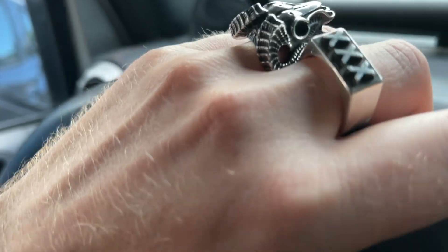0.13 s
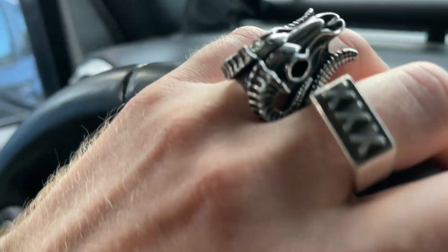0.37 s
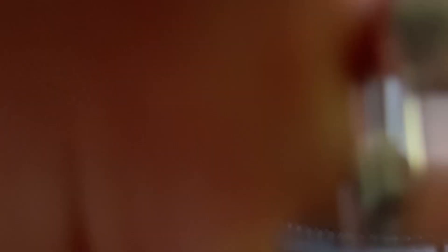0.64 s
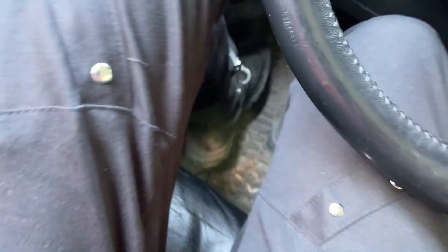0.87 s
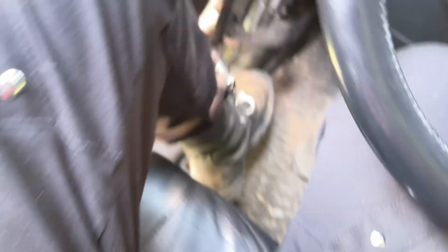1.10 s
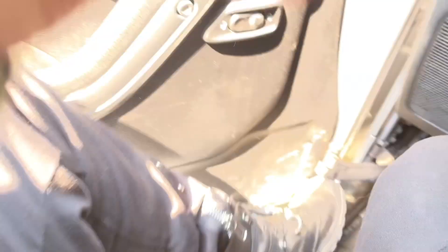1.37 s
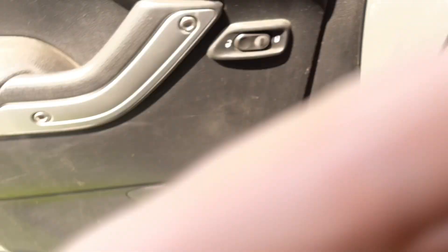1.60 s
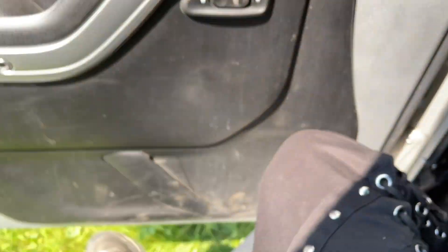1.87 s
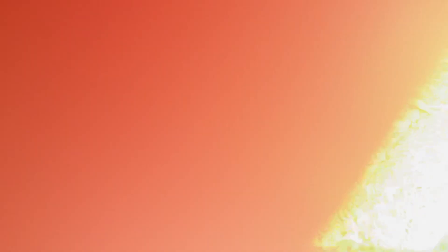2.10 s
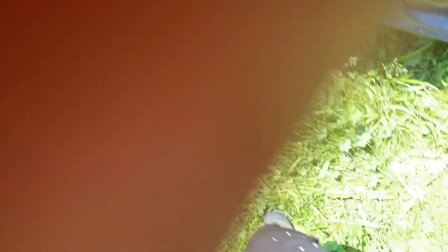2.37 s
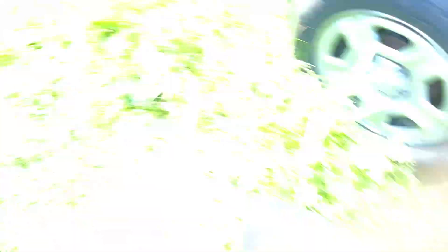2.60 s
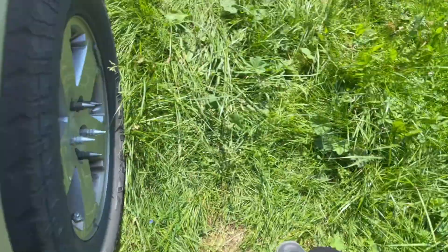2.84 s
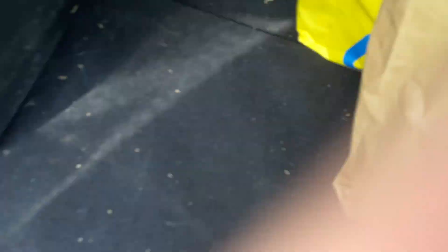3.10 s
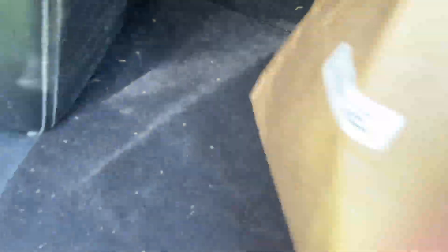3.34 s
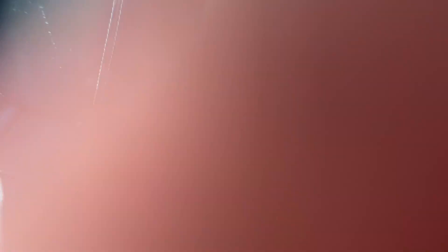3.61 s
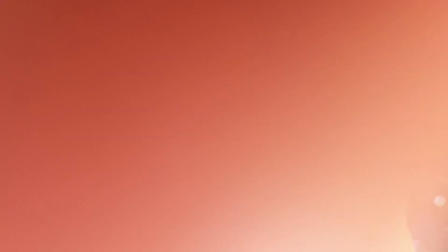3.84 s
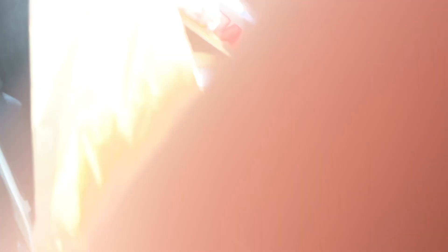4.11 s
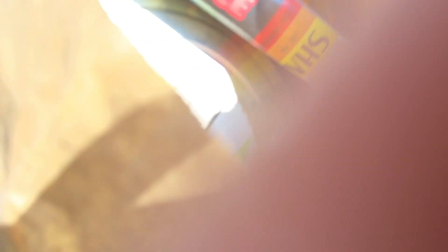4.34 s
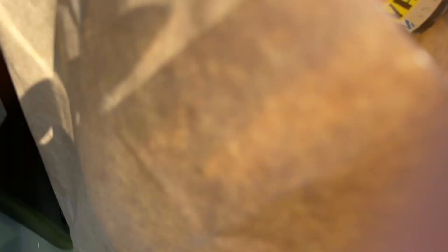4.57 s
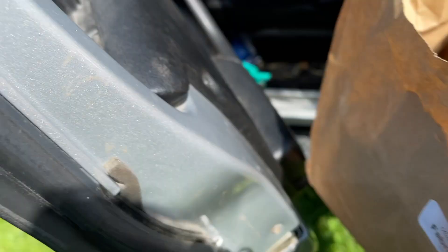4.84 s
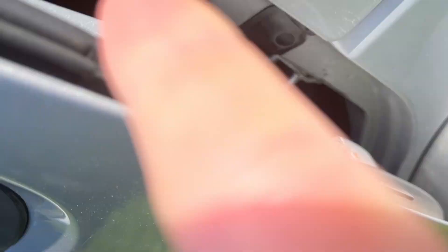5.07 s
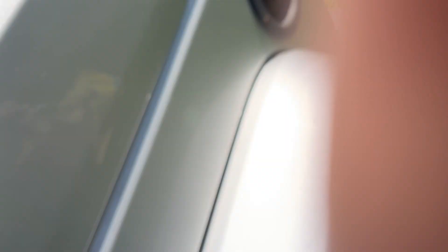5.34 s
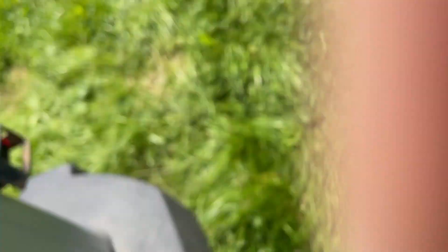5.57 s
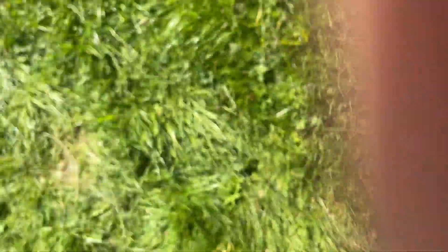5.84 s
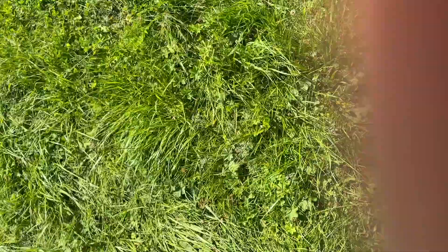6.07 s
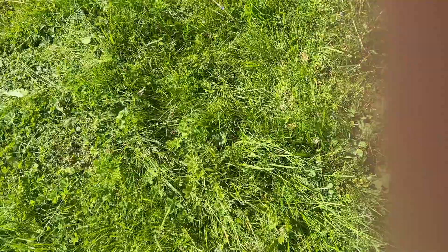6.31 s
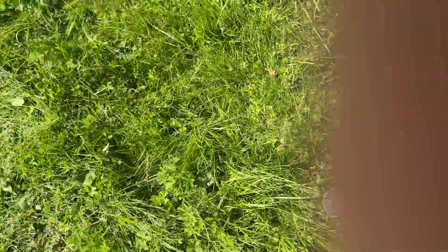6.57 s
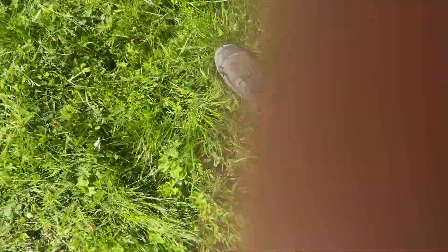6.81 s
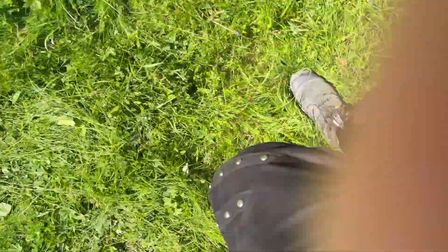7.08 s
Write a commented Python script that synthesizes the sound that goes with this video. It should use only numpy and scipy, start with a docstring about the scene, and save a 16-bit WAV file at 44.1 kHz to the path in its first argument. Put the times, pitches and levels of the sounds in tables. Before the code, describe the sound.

Bright key clinks and a clunky car door opening, then a heavy slam, loud paper bag crumpling, another door slam and faint knocks over grass.

```python
"""Inside a parked car a hand takes the keys and opens the door; outside on grass the door is slammed,
a paper bag is lifted out, a second door is shut and footsteps follow. Keys, knocks and doors are struck
modes with bursts of noise; cloth, paper and sliding surfaces are coloured noise that sticks and slips.
The phone is held in a moving hand, which rumbles and knocks on its case; close reflections are added,
and its two microphone ports hear the treble out of step."""
import sys
import numpy as np
from scipy import signal
from scipy.fft import rfft, irfft, next_fast_len
from scipy.io import wavfile
from scipy.ndimage import uniform_filter1d

SR = 44100
rng = np.random.default_rng(int(sys.argv[2]) if len(sys.argv) > 2 else 0)


def voltage_ratio(level):
    """Linear amplitude factor for a level in decibels (scalar or array-like)."""
    return 10 ** (np.asarray(level, float) / 20)


def bounce(signal):
    """Save signal as a 16-bit WAV file at the path given by the first command-line argument."""
    frames = np.transpose(np.atleast_2d(signal))
    limited = np.clip(frames, -1, 1)
    pcm = np.round(limited * 32767).astype(np.int16)
    wavfile.write(sys.argv[1], SR, pcm)


N = 317079


def at_hz(points, hz):
    """A (frequency [Hz], value) table read on a log-frequency axis."""
    f, value = np.transpose(points)
    return np.interp(np.log(hz + 1), np.log(f + 1), value)


def shaped(x, gain):
    """Filter by a gain given as a function of frequency."""
    size = next_fast_len(N + 8192)
    hz = np.arange(size // 2 + 1) * SR / size
    return irfft(rfft(x, size) * gain(hz), size)[..., :N]


# how far a broad source differs between the ports: (frequency [Hz], level of the differing part [dB])
PORT_DIFFERENCE = [(60, -10.5), (250, -10.5), (600, -4.5), (4000, -10.5), (7000, -5), (13000, -61)]


def noise(spectrum):
    """Steady noise of a given colour from a broad source, partly different at each port; rms 1."""
    mid, side = rng.standard_normal((2, N))
    side = shaped(side, lambda hz: voltage_ratio(at_hz(PORT_DIFFERENCE, hz)))
    pair = mid + side * [[1], [-1]]
    x = shaped(pair, lambda hz: voltage_ratio(at_hz(spectrum, hz)))
    return x / x.std()


def gains(tables):
    """Columns of dB over time as smoothed gains, near silence outside each table; tables add up."""
    out, seconds = 0, np.arange(N) / SR
    for rows in tables:
        s, *columns = np.transpose(rows)
        out = out + np.array([voltage_ratio(np.interp(seconds, s, c, left=-120, right=-120)) for c in columns])
    return uniform_filter1d(out, size=200, axis=1)


def dying(t60):
    """Amplitude falling 60 dB in t60 seconds, cut after 1 s at most."""
    return voltage_ratio(-60 * np.arange(int(min(t60, 1) * SR)) / (t60 * SR))


def swelling(length, rise_s):
    """Exponential onset with a time constant of rise_s."""
    return 1 - np.exp(-np.arange(length) / (rise_s * SR))


def add(out, s, x):
    """Place a sound at s seconds."""
    i = round(s * SR)
    out[:, i:i + x.shape[-1]] += x[..., :N - i]


def tone(hz, t60):
    """One struck mode: a decaying sine."""
    fall = dying(t60)
    return fall * np.sin(2 * np.pi * hz / SR * np.arange(len(fall)))


def burst(source, s, t60, rise_s=0.003):
    """A puff cut from running noise, with a soft onset and an exponential decay."""
    fall, i = dying(t60), round(s * SR)
    fall = fall * swelling(len(fall), rise_s)
    return source[:, i:i + len(fall)] * fall[:N - i]


def slips(per_s, spread_db, t60, steady):
    """Envelope of rubbing: a steady part plus random slips that start sharply and die; rms 1."""
    happens = rng.random(N) < per_s / SR
    sizes = voltage_ratio(spread_db * np.minimum(rng.exponential(1, N), 5)) * happens
    envelope = signal.lfilter([1], [1, -voltage_ratio(-60 / (t60 * SR))], sizes)
    envelope = steady + envelope / envelope.mean()
    return envelope / np.sqrt(np.mean(envelope ** 2))


def rubbing(rows, colours, grain):
    """Surfaces stick and slip: all parts of the spectrum share one grain of slips."""
    return grain * sum(gain * noise(colour) for gain, colour in zip(gains(rows), colours))


# colour of still air: (frequency [Hz], relative level [dB per Hz])
AIR_COLOUR = [(24, -27), (40, 3), (91, 4), (1300, -19), (6930, -29), (8830, -14), (10200, -46), (11000, -7),
              (13000, -115)]


def still_air():
    """Steady coloured noise, the quiet bed under everything."""
    return voltage_ratio(-56) * noise(AIR_COLOUR)


# the hand shifts on the phone: (time [s], rumble level [dB])
GRIP_MOVES = [(0, -37.5), (.12, -57), (.24, -28.5), (.45, -35), (.59, -42.5), (.74, -41), (1.3, -35.5),
              (1.65, -33.5), (1.97, -40), (2.17, -50), (2.45, -43), (2.64, -63), (3.1, -34), (3.6, -36.5),
              (4.4, -44.5), (4.6, -23.5), (4.7, -43.5), (5.05, -35), (5.2, -34), (5.77, -36), (6.07, -37),
              (6.14, -58), (6.6, -57.5), (6.85, -50), (6.93, -42.5), (7.05, -40), (7.19, -57)]
# low rumble and creak of handling: (frequency [Hz], relative level [dB per Hz])
RUMBLE_COLOUR = [(15, -46), (25, -23.5), (60, 0.5), (130, -8.5), (170, -12.5), (290, -120)]
CREAK_COLOUR = [(65, -7.5), (110, -4), (237, -6), (291, -16.5), (450, -22), (580, -23), (990, -120)]
FIRM_GRIP_DB, FIRM_CREAK_DB = -39, -47.5   # rumble level of a firm grip, and the creak gain it gives
CREAK_FOLLOWS = 1.03   # dB of creak per dB of rumble


def hand():
    """Lumpy rumble carried through the case, with a creak that grows as the grip firms."""
    moves = [(s, db, FIRM_CREAK_DB + CREAK_FOLLOWS * (db - FIRM_GRIP_DB)) for s, db in GRIP_MOVES]
    rumble, creak = gains([moves])
    lumps = uniform_filter1d(slips(30, 0.84, 0.081, 0.35), size=300)
    shifts = uniform_filter1d(slips(14.0, 0.83, 0.3, 0.2), size=900)
    return rumble * noise(RUMBLE_COLOUR) * shifts + creak * noise(CREAK_COLOUR) * lumps


# sleeve and trousers rub: (time [s], dull level [dB], bright part against the dull [dB])
CLOTH_RUBS = [(0, -62.5, 28), (.3, -64.5, 2.5), (.46, -54.5, 8), (.59, -72, 4), (.78, -40, 5.5),
              (.9, -41, -9), (1.12, -49, -1.5), (1.64, -43, -9.5), (1.83, -48.5, -4.5), (1.92, -62.5, -2),
              (2.05, -50.5, -0.5), (2.2, -60.5, -3.5), (2.6, -61, 10.5), (2.7, -44.5, 5), (2.78, -56.5, -7),
              (3.05, -55, 10), (3.2, -82, -18), (5.2, -55, -8), (5.56, -50.5, 3), (5.8, -61.5, -6),
              (6.1, -59, 2.5), (6.29, -51, -4.5), (6.6, -60.5, -4.5), (6.75, -52.5, 6.5), (6.87, -56, 1),
              (7.19, -47, -4)]
# dull and bright parts of cloth: (frequency [Hz], relative level [dB per Hz])
DULL_CLOTH = [(210, -6), (350, 0.5), (555, 1), (702, -2), (1980, -7), (2800, -16), (3640, -13),
              (6160, -120)]
BRIGHT_CLOTH = [(1290, -10), (2200, -7.5), (4960, -5.5), (8930, -3), (10100, 4.5), (11300, 0), (12500, -28),
                (14000, -43)]


def cloth():
    """Fibres catch and let go: a dull and a bright noise slip together."""
    rows = [(s, db, db + tilt) for s, db, tilt in CLOTH_RUBS]
    return rubbing([rows], [DULL_CLOTH, BRIGHT_CLOTH], slips(150, 2.3, 0.089, 0.73))


# keys clink: (time [s], level [dB], strongest mode [Hz], crack against the clink [dB])
KEY_CLINKS = [(0.011, -14, 9350, -3), (0.0299, -12.5, 7100, -21), (0.0453, -6, 9430, -34),
              (0.1056, -28, 9400, -15), (0.1243, -24.5, 8300, -9), (0.149, -28, 7300, -12),
              (0.1752, -31, 7250, -5), (0.224, -27, 7900, -4), (0.2422, -27, 7600, 2.5),
              (0.2697, -30.5, 7860, 3.5), (0.3431, -18, 6900, 0), (0.3745, -37, 4220, 8),
              (0.3927, -28, 8100, 0), (0.415, -24.5, 8800, -10), (0.425, -24, 8400, -18),
              (0.4425, -26, 11300, -18), (0.4722, -22, 11000, -12), (0.4882, -20.5, 8500, -10),
              (0.4948, -18, 8200, -3), (0.519, -28, 6900, -6), (0.604, -26, 7750, -18),
              (0.636, -38, 7680, -24), (0.673, -19.5, 8740, 0), (0.7267, -23, 11000, -15),
              (0.7478, -19, 8100, 7), (0.76, -24, 11100, -22), (0.893, -31, 8600, -18),
              (1.028, -29, 7120, -8), (1.05, -11, 9300, -29), (1.1036, -23, 8940, 2),
              (1.1623, -24.5, 5040, -4), (1.186, -30.5, 5050, 0)]
# the bunch of keys: (frequency [Hz], relative level [dB], ring time to -60 dB when hung free [s])
BUNCH_MODES = [(3980, -12, 0.071), (5040, -21, 0.082), (7300, -19, .1), (7550, -6, 0.13), (7500, -2.5, 0.2),
               (8130, -13, 0.19), (8940, -12, 0.042), (8470, 0, 0.15), (9430, 13, 0.12), (9200, -5, 0.051),
               (11000, 0, 0.16), (12400, -25, .05)]
# keys lean on each other: uneven [dB], detuned [share of pitch], damped [share of the free ring time]
KEY_SPREAD_DB, KEY_DETUNE, KEY_DAMPING = 4.5, 0.015, 0.36


def keys():
    """Each clink is a crack with a rattling tail, one short strong mode and the bunch ringing unevenly."""
    out = np.zeros((2, N))
    hiss = noise([(1500, -13.0), (4000, -5.5), (8000, -2.5), (12000, -2), (15000, -3.0)])
    rattle = hiss * slips(300, 4.6, 0.013, 0.39)
    chance = rng.standard_normal((len(KEY_CLINKS), len(BUNCH_MODES), 2))
    for (s, db, hz, crack_db), draw in zip(KEY_CLINKS, chance):
        add(out, s, voltage_ratio(db + crack_db) * burst(hiss, s, 0.0097, rise_s=0.00032))
        add(out, s, voltage_ratio(db + crack_db / 2 - 12) * burst(rattle, s, 0.1))
        add(out, s, voltage_ratio(db - 4.5) * tone(hz, 0.017))
        for (mode_hz, mode_db, ring_s), (strength, lean) in zip(BUNCH_MODES, draw):
            ring = tone(mode_hz * (1 + KEY_DETUNE * lean), KEY_DAMPING * ring_s)
            add(out, s, voltage_ratio(db + mode_db + KEY_SPREAD_DB * strength - 25.5) * ring)
    return out


# soft bumps of the hand on the case: (time [s], level [dB], note [Hz], note's fall by 60 dB [s])
HAND_BUMPS = [(0.011, -30, 204, 0.094), (0.228, -9.5, 159, 0.059), (0.38, -17, 80, 0.11),
              (.708, -21.5, 105, 0.2), (1.343, -21.5, 103, 0.12), (1.65, -16, 167, 0.088),
              (2.1, -27, 113, 0.13), (2.29, -32, 147.5, 0.078), (3.446, -17, 205, 0.1),
              (3.625, -24, 200, 0.15), (4.464, -9.5, 212, 0.047), (4.564, -5, 190, 0.049),
              (4.577, -1, 109, 0.036), (4.822, -26.5, 84.5, .12), (5.082, -23.5, 108, 0.11),
              (5.551, -29, 154, .1), (5.81, -21, 154, 0.069), (5.872, -22, 150, 0.084),
              (5.932, -23.5, 89, 0.077), (6.004, -20.5, 156, 0.061), (6.048, -20.5, 170, 0.048),
              (6.74, -21.5, 105, 0.061), (6.921, -25, 107, 0.12), (6.96, -29, 62.4, 0.19),
              (7.01, -29, 74.6, 0.14)]


def bumps():
    """A soft blow: one low note that swells in, with a puff of creak."""
    out, creak = np.zeros((2, N)), noise(CREAK_COLOUR)
    for s, db, hz, t60 in HAND_BUMPS:
        note = tone(hz, np.clip(t60, 0.03, 0.4))
        add(out, s, voltage_ratio(db + 3.0) * note * swelling(len(note), 0.012))
        add(out, s, voltage_ratio(db - 12.5) * burst(creak, s, 2.1 * t60, rise_s=0.0027))
    return out


# knocks on trim, case and ground: (time [s], level [dB], body note [Hz], treble level [dB])
HARD_KNOCKS = [(0.184, -27.5, 416, -54), (0.375, -23.5, 533, -54), (0.636, -31, 443, -32.5),
               (0.704, -28.5, 412, -63), (.75, -28, 2200, -23), (0.839, -14, 1200, -38),
               (0.892, -13.5, 1530, -18.5), (1.428, -29, 775, -43), (1.485, -32, 515, -32),
               (1.64, -12.5, 576, -51), (1.699, -33, 473, -37), (1.732, -16, 514, -58),
               (1.793, -12.5, 535, -30.5), (1.935, -19.5, 500, -55), (1.989, -24.5, 450, -28.5),
               (2.223, -32, 494, -55), (2.316, -34, 480, -42), (3.065, -11, 764, -27),
               (3.921, -18.5, 623, -52), (4.399, -32, 556, -66), (4.447, -20, 958, -44),
               (4.702, -26, 640, -60), (4.76, -18.5, 1080, -60), (5.682, -21.5, 550, -24.5),
               (5.79, -42, 490, -54), (5.861, -37, 301, -35), (5.933, -49, 344, -55),
               (5.955, -53, 342, -40), (6.319, -33.5, 292, -49), (6.366, -31.5, 404, -42),
               (6.455, -35, 937, -35.5), (6.714, -26.5, 358, -33), (6.868, -22.5, 593, -34),
               (6.899, -35, 550, -52), (6.909, -40, 1200, -41), (6.959, -30, 564, -29.5),
               (7.003, -31, 565, -48), (7.037, -21.5, 700, -28), (7.058, -32, 1200, -33),
               (7.119, -21.5, 1000, -30)]
KNOCK_CYCLES = 11   # a body note falls 60 dB within this many cycles
TOUCH_T60_S, KNOCK_T60_S = 0.007, 0.051   # the first touch, and the dull puff after it


def knocks():
    """A hard blow: a damped body note, a dull puff and a short tick."""
    out = np.zeros((2, N))
    dull = noise([(120, -25), (300, 18.5), (700, 16.5), (2000, 5), (3500, -12), (6000, -24)])
    tick = noise([(1500, 10.0), (3000, 2.5), (8000, -6.5), (13000, -8), (15000, -11)])
    for s, db, hz, treble_db in HARD_KNOCKS:
        add(out, s, voltage_ratio(db - 3) * tone(hz, KNOCK_CYCLES / hz))
        add(out, s, voltage_ratio(db - 3.5) * burst(dull, s, TOUCH_T60_S, rise_s=0.0006))
        add(out, s, voltage_ratio(treble_db + 3.5) * burst(tick, s, TOUCH_T60_S, rise_s=0.00024))
        add(out, s, voltage_ratio(db - 9.5) * burst(dull, s, KNOCK_T60_S))
        add(out, s, voltage_ratio(treble_db + 2.5) * burst(tick, s, 0.29 * KNOCK_T60_S))
    return out


# metallic clatter: (frequency [Hz], relative level [dB per Hz])
CLATTER_COLOUR = [(180, -22), (300, -2), (1940, -19.5), (2720, -22.5), (4190, -27.5), (8920, -30.5),
                  (10100, -24), (11200, -25), (14000, -90)]
LATCH_HZ = 600   # modes from here up belong to the latch
BODY_DB, BODY_T60_S = -24.5, 0.79   # the car body rocks on after a blow; level against the panel


def door(blows, modes):
    """Each contact pumps cabin air (lowest mode), rings panel and latch and throws a dying clatter."""
    out, metal = np.zeros((2, N)), noise(CLATTER_COLOUR) * slips(400, 4.7, 0.014, 1.0)
    shudder = noise([(50, -17), (110, 6.5), (300, 0.5), (700, -22.5), (1500, -37.5), (3000, -61.5)])
    rocking = noise(RUMBLE_COLOUR) + 0.5 * noise(CREAK_COLOUR)
    for s, boom_db, panel_db, clatter_db, t60 in blows:
        add(out, s, voltage_ratio(clatter_db) * burst(metal, s, np.clip(t60, 0.01, 0.4), rise_s=0.0036))
        add(out, s, voltage_ratio(panel_db - 12) * burst(shudder, s, 0.21, rise_s=0.001))
        add(out, s, voltage_ratio(panel_db + BODY_DB) * burst(rocking, s, BODY_T60_S, rise_s=0.019))
        for k, (hz, db, ring_s) in enumerate(modes):
            if k == 0:
                drive_db = boom_db
            elif hz < LATCH_HZ:
                drive_db = panel_db - 14
            else:
                drive_db = clatter_db - 10.0
            polarity = (-1) ** k
            add(out, s, polarity * voltage_ratio(db + drive_db) * tone(hz, np.clip(ring_s, 0.02, 1.2)))
    return out


# latch and frame meet as a door opens, is slammed, and a second is shut, one list for each:
# (time [s], boom level [dB], panel level [dB], clatter level [dB], clatter's fall by 60 dB [s])
DOOR_CONTACTS = [
    [(.752, -47, -21, -38, 0.058), (.779, -11.5, 3, -9, 0.17), (.800, 4, -0.5, -43, 0.13),
     (.893, -22, -27, -21, 0.038), (.938, -12, -30, -50, 0.037), (.988, -33, 0, -3.5, 0.028),
     (1.0, -28, -19, -21, 0.12), (1.045, -14, -51, -40, 0.088)],
    [(2.707, -38, -37, -13, 0.029), (2.716, -12, 1, -9.5, 0.11), (2.730, -8, -12, -14, 0.038),
     (2.746, -5, -7.5, -13.5, 0.063), (2.762, -8.5, -2.5, -33, 0.23)],
    [(5.185, -55, -24, -30.5, 0.049), (5.200, -23, -5, -8.5, 0.14), (5.213, -6, -6, -11.5, 0.064),
     (5.225, 2, 0.5, -11, 0.043), (5.245, 6.5, -8.5, -10, 0.048)],
]
# door skin and cabin air: (frequency [Hz], relative level [dB], ring time to -60 dB [s])
OPENED_DOOR = [(60.3, 2, 0.23), (93.6, -1.5, 0.56), (159.6, -5.5, 0.39), (251, -20, 0.19),
               (324, 0.5, 0.046), (494, -3.5, 0.13), (770, -30, 0.086), (1350, -9, 0.037)]
FRONT_DOOR = [(48.2, -0.5, 0.74), (95.8, 4, 0.9), (125, -14, 0.26), (205, 0, 0.46), (267.2, -2, 0.33),
              (345, -7, 0.11), (451, -2, 0.094), (672, -9, 0.18), (864, -8, 0.077), (1173, 4, 0.038),
              (1290, -33, 0.041)]
REAR_DOOR = [(74.3, -11.5, 0.25), (141.4, -2.5, 0.8), (190, 7, 0.22), (215, 8.5, 0.41), (257, -10, 0.36),
             (323, -16, 0.13), (441, -14, 0.21), (613, 0.5, 0.093), (776, -2, 0.075), (1030, -17, 0.12),
             (1600, 4, 0.034)]


def doors():
    """Opening, slam and second door, each a run of contacts exciting its own set of modes."""
    return sum(map(door, DOOR_CONTACTS, [OPENED_DOOR, FRONT_DOOR, REAR_DOOR]))


# a surface slides past: (time [s], length [s], dull level [dB], bright level [dB], top fizz level [dB])
SLIDES = [(1.936, 0.047, -37.5, -46.5, -38), (2.084, 0.083, -50.5, -49.5, -49.5),
          (3.592, 0.047, -26, -18.5, -23.5), (4.311, 0.055, -45.5, -47.5, -45),
          (4.447, 0.014, -32, -42.5, -43), (4.827, 0.076, -28, -34, -24.5), (4.93, 0.094, -30, -37, -35.5),
          (5.44, 0.051, -47.5, -57, -51), (5.53, 0.052, -49, -74, -57), (5.682, 0.047, -43, -51.5, -46.5),
          (6.989, 0.035, -38.5, -65, -50), (7.091, 0.043, -41, -66, -60)]
# dull, bright and fizzing parts of paper and sliding: (frequency [Hz], relative level [dB per Hz])
DULL_PAPER = [(210, -2.5), (350, -1.5), (600, -4.5), (843, -4), (2800, -13), (3640, -20), (6160, -120)]
BRIGHT_PAPER = [(1290, -15), (2200, -5), (2910, -9.5), (4300, -3), (8000, -9), (10400, -6), (17600, -120)]
PAPER_FIZZ = [(5500, -56), (7500, -1.5), (9500, 4), (11500, 2), (13500, -26)]


def swishes():
    """Sliding starts at once, holds for just over half its length, falls 9 dB and stops."""
    strokes = []
    for s, length, *db in SLIDES:
        end_db = np.subtract(db, 9)
        strokes.append([(s, *db), (s + 0.54 * length, *db), (s + length, *end_db)])
    return rubbing(strokes, [DULL_PAPER, BRIGHT_PAPER, PAPER_FIZZ], slips(360, 0.47, 0.017, 1.0))


def crinkles(per_s, cycles):
    """Small creases pop at random, each ringing one of 16 short notes; rms 1."""
    happens = rng.random(N) < per_s / SR
    sizes = voltage_ratio(4.0 * np.minimum(rng.exponential(1, N), 3.5)) * happens
    out, dealt = 0, rng.integers(0, 16, N)
    for k, hz in enumerate(np.geomspace(700, 9000, 16)):
        r, w = voltage_ratio(-60 * hz / (cycles * SR)), 2 * np.pi * hz / SR   # pole radius and angle
        pops = sizes * (dealt == k) + 1e-18
        ringing = signal.lfilter([0, np.sin(w)], [1, -2 * r * np.cos(w), r * r], pops)
        out = out + ringing * np.sqrt(hz)
    return out / out.std()


# the bag snaps: (time [s], level [dB], crease note [Hz])
BAG_SNAPS = [(3.0674, -19.5, 1860), (3.161, -14, 1930), (3.194, -18.5, 4640), (3.2499, -18.5, 1750),
             (3.311, -8.5, 7060), (3.3362, -12.5, 6020), (3.367, -8, 1600), (3.452, -7.5, 1820),
             (3.4665, -5.5, 8190), (3.4776, -7.5, 1660), (3.5114, -4.5, 880), (3.5573, -14, 8000),
             (3.584, -11.5, 6300), (3.5984, -21, 1890), (3.6268, -8, 2050), (3.699, -10.5, 1940),
             (3.7295, -10.5, 5600), (3.774, -11.5, 4860), (3.8082, -12, 4760), (3.842, -7.5, 3760),
             (3.8948, -21.5, 2170), (3.92, -23, 1540), (3.9654, -27, 1700), (4.0182, -16.5, 2050),
             (4.04, -22.5, 2050), (4.0538, -18, 1550), (4.1064, -31.5, 1860), (4.4597, -12.5, 2480),
             (4.5558, -6.5, 1920), (4.578, -15, 1950), (4.804, -28, 4900), (4.8537, -12, 1770),
             (4.8732, -8, 1970), (4.9398, -17, 1510), (4.9765, -17.5, 3400), (5.009, -16.5, 3540),
             (5.061, -30.5, 2310)]
# the bag crumples: (time [s], dull level [dB], bright part against the dull [dB])
BAG_CRUMPLES = [(3.051, -44, 12), (3.12, -38.5, 7), (3.22, -31, -1), (3.42, -32, -3), (3.68, -34.5, 9),
                (3.82, -32, 0.5), (3.89, -43.5, -8), (4.151, -39, -14.5), (4.3, -64.5, -6),
                (4.44, -63, 2.5), (4.54, -33, -7.5), (4.7, -53, -5.5), (4.81, -59, -5), (4.89, -25, -14.5),
                (4.97, -45, 1), (5.072, -36, -14.5), (5.17, -60, -23)]
FIZZ_DB = -3.5   # top fizz against the bright part
SNAP_T60_S, SNAP_DULL_DB = 0.03, -16
BREAK_RISE_S, BREAK_T60_S = 0.002, 0.014   # the crease giving way


def bag():
    """Stiff paper: dense crackle, small crinkles, and creases that snap."""
    out, dull = np.zeros((2, N)), noise(DULL_PAPER)
    bright = noise(BRIGHT_PAPER) + 0.56 * noise(PAPER_FIZZ)
    for s, db, hz in BAG_SNAPS:
        add(out, s, voltage_ratio(db - 14.5) * burst(bright, s, SNAP_T60_S))
        add(out, s, voltage_ratio(db - 0.5) * burst(bright + 0.59 * dull, s, BREAK_T60_S, rise_s=BREAK_RISE_S))
        add(out, s, voltage_ratio(db - 7.5) * tone(hz, 0.67 * SNAP_T60_S))
        add(out, s, voltage_ratio(db + SNAP_DULL_DB) * burst(dull, s, 2.92 * SNAP_T60_S))
    levels = gains([[(s, db, db + tilt, db + tilt + FIZZ_DB) for s, db, tilt in BAG_CRUMPLES]])
    for level, colour in zip(levels, [DULL_PAPER, BRIGHT_PAPER, PAPER_FIZZ]):
        out = out + level * slips(120, 2.0, 0.03, 0.6) * noise(colour)   # each part slips by itself
    return out + voltage_ratio(-2.5) * levels[1] * crinkles(250, 9.0)


# reflections: (frequency [Hz], level against the direct sound [dB])
ECHO_COLOUR = [(60, -45), (250, -18), (600, -5.5), (3000, -3), (7000, -8.5), (13000, -9)]
ECHO_T60_S, POSE_S = 0.044, 0.1   # die-away, and time between poses of the phone


def echoes(x):
    """Close reflections off seats, glass and hand, different at each port and new with every pose."""
    fall, hop = dying(ECHO_T60_S), int(POSE_S * SR)
    window = np.sin(np.pi * np.arange(2 * hop) / (2 * hop))   # poses crossfade
    wet, padded = np.zeros((2, N + 4 * hop + len(fall))), np.pad(x, (hop, 2 * hop))
    for i in range(0, N + hop, hop):
        tail = rng.standard_normal((2, len(fall))) * fall / np.sqrt(np.sum(fall ** 2))
        piece = signal.fftconvolve([padded[i:i + 2 * hop] * window], tail, axes=1)
        wet[:, i:i + piece.shape[1]] += piece
    return shaped(wet[:, hop:hop + N], lambda hz: voltage_ratio(at_hz(ECHO_COLOUR, hz)))


def scene():
    """All sources and their reflections."""
    near = still_air() + hand() + cloth() + keys() + bumps() + knocks() + doors() + swishes() + bag()
    return near + echoes(near.mean(axis=0))


def roll_off(x):
    """The treble ends steeply here."""
    return signal.sosfilt(signal.butter(12, 16750, fs=SR, output="sos"), x)


# response of the microphone: (frequency [Hz], gain [dB])
MICROPHONE_RESPONSE = [(8, -52), (38, -1), (12000, 1), (13000, -5), (14000, -14), (16500, -23)]
# left port against right: (frequency [Hz], level difference [dB])
LEVEL_BALANCE = [(60, 1), (240, 2), (950, 0.5), (3770, 3.5), (15000, -1)]
# left port against right: (frequency [Hz], phase lead [radians])
PHASE_LEAD = [(0, 0), (1720, -0.9), (3100, 1.0), (6630, 0.2), (7410, 1.1), (8870, -0.4), (9820, -2.7),
              (11000, -4.3), (11500, -6.1), (12600, -6.4), (13200, -9.3), (14600, -9.6), (15000, -13.0),
              (16300, -10.1)]
LIMIT_DB, RELEASE_DB_PER_S = -0.5, 40


def record(dry):
    """The two ports differ in level and phase; a limiter ducks loud peaks and lets go slowly."""
    sides = np.array([[0.5], [-0.5]])   # each port takes half of the difference

    def port_gain(hz):
        """Complex response of both ports."""
        level = voltage_ratio(at_hz(MICROPHONE_RESPONSE, hz) + sides * at_hz(LEVEL_BALANCE, hz))
        return level * np.exp(1j * sides * np.interp(hz, *np.transpose(PHASE_LEAD)))

    ports = shaped(dry, port_gain)
    peak_db = 20 * np.log10(np.abs(ports).max(axis=0) + 1e-9)
    over_db = np.maximum(peak_db - LIMIT_DB, 0)
    ramp = RELEASE_DB_PER_S * np.arange(N) / SR
    held_db = np.maximum.accumulate(over_db + ramp) - ramp   # jumps up at a peak, then falls steadily
    duck_db = uniform_filter1d(held_db, size=128)
    return roll_off(ports * voltage_ratio(-duck_db))


dry = scene()
out = record(dry)
bounce(out)
```